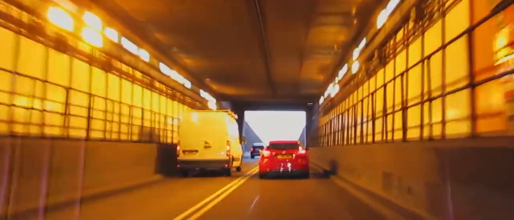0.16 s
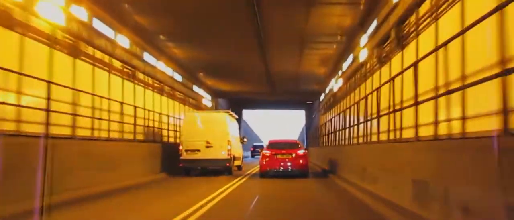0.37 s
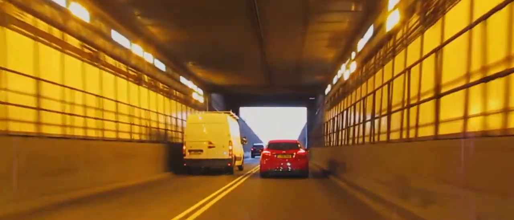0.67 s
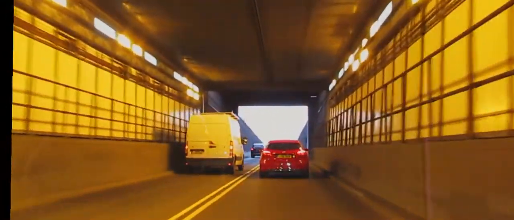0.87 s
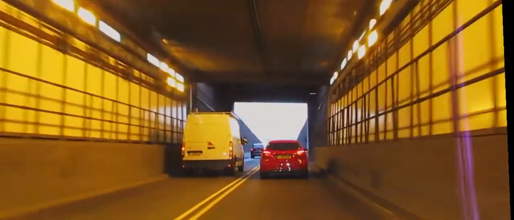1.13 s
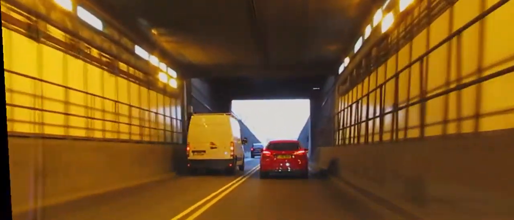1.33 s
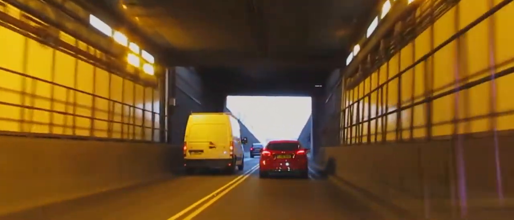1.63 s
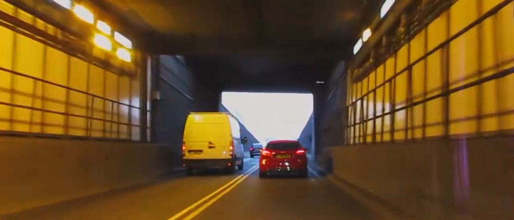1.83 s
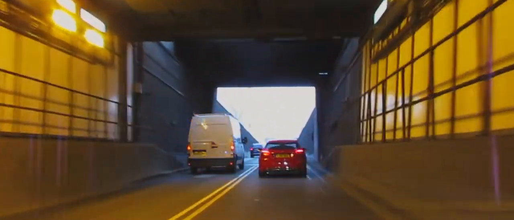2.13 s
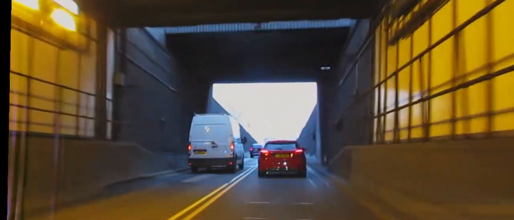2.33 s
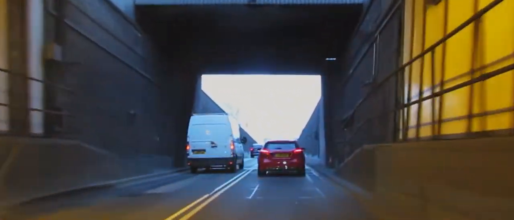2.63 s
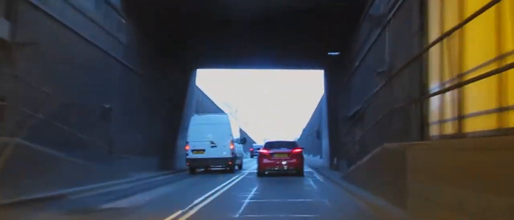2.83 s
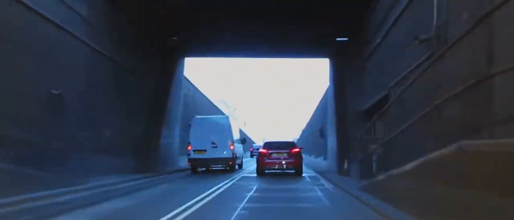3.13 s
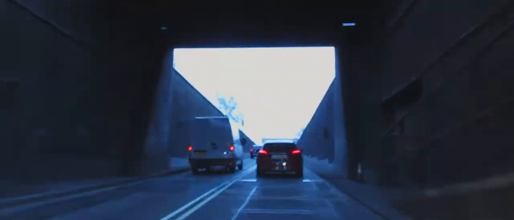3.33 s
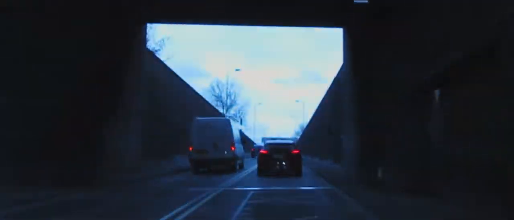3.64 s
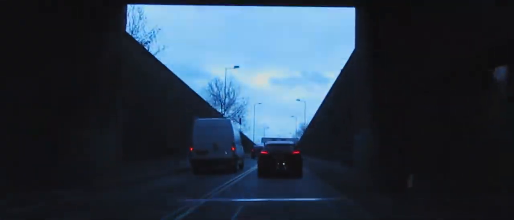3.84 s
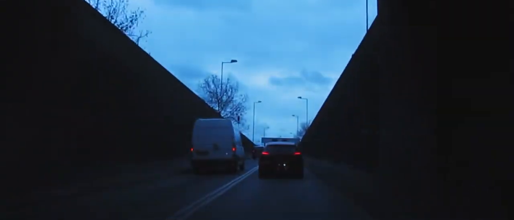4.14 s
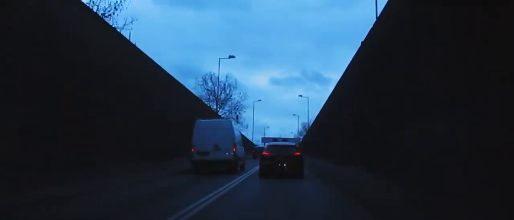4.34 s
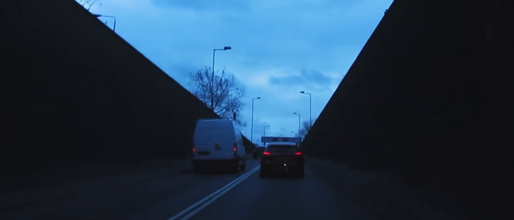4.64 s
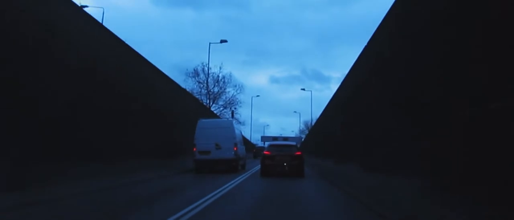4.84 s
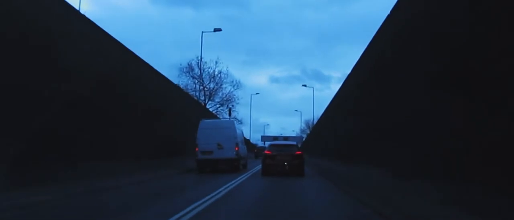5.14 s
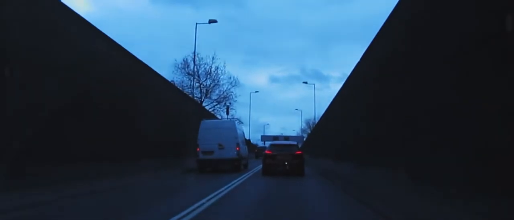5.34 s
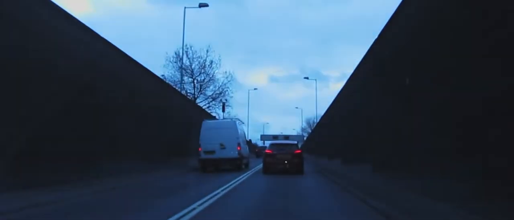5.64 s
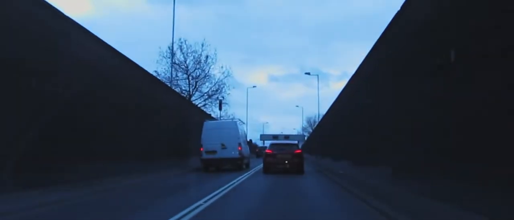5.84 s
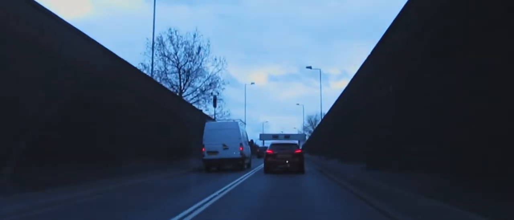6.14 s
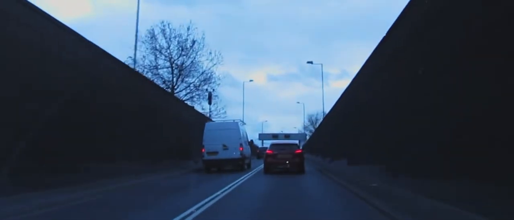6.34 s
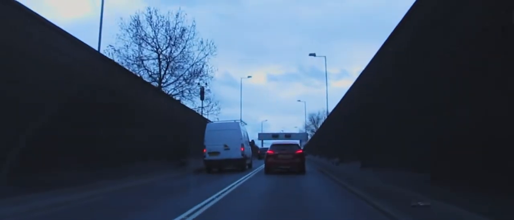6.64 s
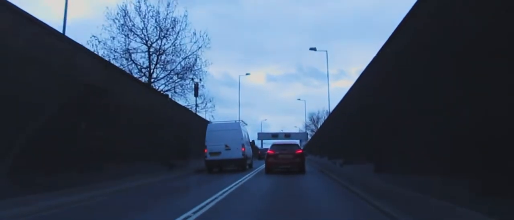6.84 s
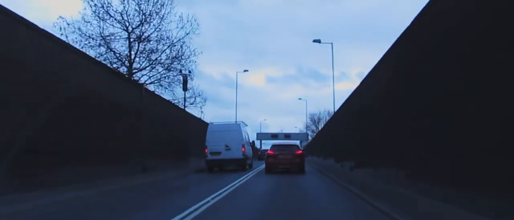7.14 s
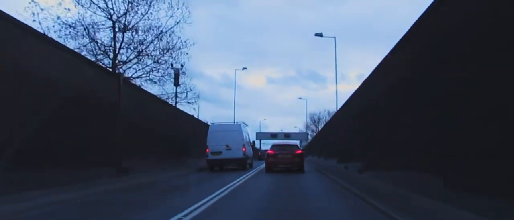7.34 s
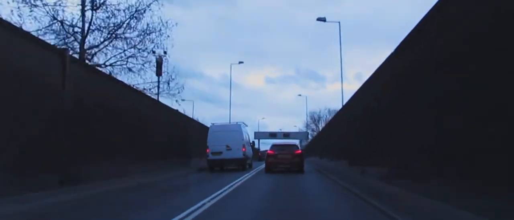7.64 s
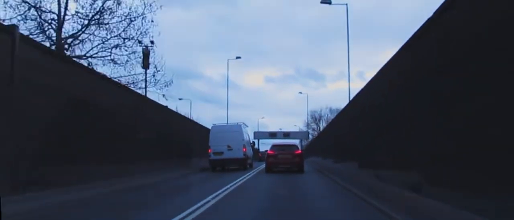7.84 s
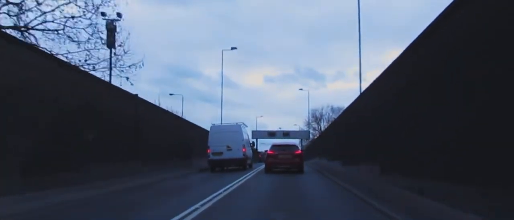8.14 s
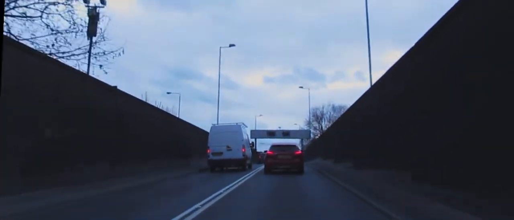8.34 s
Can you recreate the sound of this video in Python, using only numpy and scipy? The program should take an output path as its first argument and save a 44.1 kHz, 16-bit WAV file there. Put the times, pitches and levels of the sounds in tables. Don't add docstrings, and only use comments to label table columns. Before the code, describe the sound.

Car cabin drone and dense tyre roar in a tunnel, easing past the exit with heavy bumps, small trim ticks and a harder engine pull.

```python
import sys
import numpy as np
from scipy import signal
from scipy.fft import rfft, irfft
from scipy.io import wavfile
from scipy.ndimage import uniform_filter1d

SR = 44100
rng = np.random.default_rng(int(sys.argv[2]) if len(sys.argv) > 2 else 0)


def dump_mix(stems):
    frames = np.atleast_2d(stems).T
    limited = np.clip(frames, -1, 1)
    pcm = np.round(limited * 32767).astype(np.int16)
    wavfile.write(sys.argv[1], SR, pcm)


def gain_from_db(level_db):
    decades = np.asarray(level_db, float) / 20
    return 10 ** decades


N = 374406
TIME = np.arange(N) / SR
HZ = np.fft.rfftfreq(N, 1 / SR) + 1e-3
THROTTLE_S, THROTTLE_RISE_S = 5.85, .14


def curve(table):
    return np.interp(TIME, *np.transpose(table))


def ramp(s, rise_s):
    return np.clip((TIME - s) / rise_s, 0, 1)


def hump(s, width_s):
    return np.exp(-((TIME - s) / width_s) ** 2)


def swell(s, hold_s, db, rise_db_per_s, fade_db_per_s):
    rise_db = rise_db_per_s * np.maximum(s - TIME, 0)
    fade_db = fade_db_per_s * np.maximum(TIME - s - hold_s, 0)
    return gain_from_db(db - rise_db - fade_db)


def walk(rate):
    k = int(SR / rate)
    held = np.repeat(rng.standard_normal(N // k + 1), k)
    return 1.253 * uniform_filter1d(uniform_filter1d(held, k), k)[:N]


def shape(points):
    hz, db = np.transpose(points)
    return np.interp(np.log(HZ), np.log(hz + 1), db)


def lifts(modes):
    return sum(db / (1 + (2 * (HZ - hz) / width) ** 2) for hz, width, db in modes)


def noise(db, wide_db=0.):
    # frequency in Hz, side minus mid in dB.
    spread = [(60, -18), (110, -15.5), (200, -25), (380, -13), (700, -10), (1290, -6.5), (2380, -1),
              (4400, -4.5), (8120, 3), (15000, 1)]
    mid, side = rfft(rng.standard_normal((2, N))) * gain_from_db(db)
    share = .35 / (1 + (2400 / HZ) ** 4) / (1 + (HZ / 7000) ** 4)
    side = np.sqrt(1 - share ** 2) * side + 1j * share * mid
    mid = irfft(mid, N)
    side = irfft(side * gain_from_db(shape(spread) + wide_db), N)
    return np.array([mid + side, mid - side]) / np.std(mid)


def add(out, s, sound):
    i = max(int(s * SR), 0)
    out[:, i:i + sound.shape[-1]] += sound[..., :N - i]


def engine():
    # time in seconds, level in dB.
    boom = [(0, -24), (.6, -19), (1.3, -16), (2, -19.5), (2.6, -19), (3.3, -21), (4.9, -25), (5.7, -24.5),
            (7, -20.5), (7.7, -21.5), (8.49, -17.5)]
    # multiple, level in dB against the third.
    overtones = [(2, -5), (3, 0), (4, -6.5), (5, -11)]
    firing_hz, creep_hz_per_s, pull_hz_per_s = 41.67, .68, 1.05
    hz = firing_hz + creep_hz_per_s * TIME + pull_hz_per_s * np.maximum(TIME - THROTTLE_S - .2, 0)
    third_db = -32.5 + 8 * ramp(THROTTLE_S, THROTTLE_RISE_S)
    third_db = third_db + 5 * hump(3.68, 0.4)
    third_db = third_db - 3.5 * hump(8, .25)
    phase = 2 * np.pi * np.cumsum(hz * (1 + 0.00214 * walk(6))) / SR
    out = gain_from_db(curve(boom) + 0.51 * walk(13)) * np.sin(phase)
    for k, db in overtones:
        db = db + 4.9 / (1 + ((k * hz - 205) / 12) ** 2)
        level = gain_from_db(third_db + db + 0.77 * walk(9.8))
        out += level * np.sin(k * phase + rng.uniform(0, 2 * np.pi))
    return np.sqrt(2) * out


def body():
    # frequency in Hz, density in dB per Hz.
    heave_colour = [(12, -24), (20, -1), (26, 0), (34, -4), (45, -6), (56, -10), (75, -24), (150, -70),
                    (400, -140)]
    # frequency in Hz, density in dB per Hz.
    drum_colour = [(32, -9), (55, 0), (68, -6.5), (86, -6), (200, -3.5), (270, -15.5), (330, -13.5),
                   (430, -20), (730, -120)]
    # frequency in Hz, width in Hz, lift in dB.
    panels = [(106, 15, 1.5), (131, 30, 4), (167, 25, 2), (219, 11.3, 10.5), (239.4, 17, 4.5)]
    # time in seconds, heave lift in dB, drumming lift in dB.
    bumps = [(0, 6.5, -2), (.26, 2, -2), (.5, 9, 0.5), (1.37, 5, 1), (2.01, 1, 1.5), (2.29, 3.5, 1),
             (3.03, 6, 2.5), (3.76, 9, 1), (3.45, 2, 3.5), (4.2, 3, 1), (4.58, 6, 5.5), (4.7, 1, 0.5),
             (4.82, 9.5, 3.5), (6.03, -9, 3.5), (6.22, 6, -0.5), (6.68, 1, 3.5), (7.38, -7, 3),
             (7.92, 14, 3), (8.198, 11, 3)]
    bump_width_s = .12
    pull = ramp(THROTTLE_S, THROTTLE_RISE_S)
    heave_db = -26.5 - 4 * pull + sum(db * hump(s, bump_width_s) for s, db, _ in bumps)
    drum_db = -22.5 + 2 * pull + sum(db * hump(s, bump_width_s) for s, _, db in bumps)
    heave = gain_from_db(heave_db) * noise(shape(heave_colour))
    drum = gain_from_db(drum_db + 0.99 * walk(7.6)) * noise(shape(drum_colour) + lifts(panels))
    return heave + drum


def road():
    # time in seconds, enclosure from 0 to about 1.
    enclosure = [(0, 1.1), (.12, 1.28), (.4, 1), (1.6, 0.88), (3.65, .85), (4, 0.36), (4.58, .45),
                 (4.7, 0.24), (5.8, 0.4), (6.5, 0), (8.49, 0.13)]
    # frequency in Hz, width in Hz, lift in dB.
    cabin_modes = [(316, 24, 4), (653, 91, 2.5), (799, 29, -5), (1040, 97, 3.5), (1077, 41, -6.5),
                   (1280, 26, 3), (1564, 340, 3.5), (1820, 170, 0), (2880, 420, 4), (4460, 130, 4.5),
                   (3400, 610, 3)]
    # frequency in Hz, density in dB per Hz.
    roar_colour = [(150, -12), (250, -1), (270, -3), (429, -5.5), (645, -4.5), (809, -7), (997, -5.5),
                   (1110, -9), (1310, -9.5), (2000, -27), (2600, -45), (4400, -120)]
    # frequency in Hz, density in dB per Hz.
    hiss_colour = [(1000, -21.5), (1600, -1.5), (1900, -3.5), (2500, -7.5), (3500, -13.5), (4000, -15.5),
                   (4600, -17.5), (5400, -20.5), (6500, -29), (9000, -100)]
    # frequency in Hz, density in dB per Hz.
    air_colour = [(3000, -60), (4300, -14), (5200, -1), (6300, -1), (7000, -5), (8200, -5), (9000, -7),
                  (11000, -10.5), (11800, -13), (12500, -17.5), (14000, -25), (14700, -31), (15400, -41),
                  (16500, -70)]
    # frequency in Hz, density in dB per Hz.
    spray_colour = [(5000, -50), (8500, -12), (10000, -3), (11000, 0), (11800, -2), (12200, -6),
                    (14000, -7.5), (15400, -9), (16500, -40)]
    walls = curve(enclosure)
    portal = hump(3.75, 1)
    roar_db = -25.5 + 5 * walls
    hiss_db = -38.5 + 6.5 * walls + 1.5 * portal
    air_db = -53 + 5 * walls + 3.5 * portal
    spray_db = -75.5 + 13 * ramp(4.2, 1.4) + 11 * hump(3, .45)
    spray_db = spray_db - 4 * hump(6.55, .4)
    grain, cabin = walk(8), lifts(cabin_modes)
    roar = gain_from_db(roar_db + .3 * walk(9)) * noise(shape(roar_colour) + cabin)
    hiss = gain_from_db(hiss_db + .5 * grain) * noise(shape(hiss_colour) + cabin)
    air = gain_from_db(air_db + 0.44 * grain + .5 * walk(30)) * noise(shape(air_colour))
    spray = gain_from_db(spray_db + .6 * grain + .7 * walk(20)) * noise(shape(spray_colour))
    return roar + hiss + air + spray


def mirror_whistle():
    blow = swell(3.72, .76, -53.7, rise_db_per_s=12, fade_db_per_s=45)
    return blow * noise(-22 * np.log10(1 + ((HZ - 5600) / 150) ** 2))


def thuds():
    # start in seconds, peak in dB, tyre ring in dB against it.
    joints = [
        (3.744, -5.5, -6),
        (4.2, -8, -19),
        (4.347, -7.5, -13),
        (4.554, -14, -14),
        (4.578, -2.5, -14),
        (4.694, -8, -15),
        (4.787, -5, 2.5),
        (4.94, -6, -22),
    ]
    out, t = np.zeros((2, N)), TIME[:SR // 3]
    for s, db, tyre_db in joints:
        boom = -t / 0.014 * np.exp(1 - t / 0.013) * np.sin(2 * np.pi * 40 * t)
        tyre = (t / 0.035) ** 3 * np.exp(3 - 3 * t / 0.025) * np.sin(2 * np.pi * 205 * t)
        add(out, s, gain_from_db(db) * (boom + gain_from_db(tyre_db - 1) * tyre))
    return out


def loose_trim():
    # start in seconds, peak in dB, ring in Hz, t60 in seconds, left minus right in dB.
    ticks = [(4.589, -44, 7000, .07, 1.5), (4.799, -37, 7000, .09, 2), (5.654, -39, 8000, .06, 0),
             (5.674, -39, 10950, .06, -3), (5.699, -41, 7000, .05, 0), (5.769, -42, 6300, .06, 1.5),
             (6.3704, -30, 8800, 0.068, 0), (6.3712, -32, 6000, .05, 0), (6.555, -33, 8950, 0.08, -1),
             (6.5664, -29, 6600, 0.049, 0)]
    # start in seconds, peak in dB, ring in Hz, t60 in seconds, left minus right in dB.
    knocks = [
        (5.943, -26, 2800, 0.12, 3),
        (5.945, -24, 1700, 0.088, 2),
        (6.039, -28, 2600, .06, 2.5),
    ]
    out, t = np.zeros((2, N)), TIME[:SR // 8]
    for s, db, hz, t60, pan_db in list(ticks) + list(knocks):
        decay = np.exp(-np.log(1000) * t / t60)
        burst = rng.standard_normal((2, len(t))) * decay * np.minimum(t / .001, 1)
        band = signal.butter(2, [0.42 * hz, min(1.4 * hz, 15500)], "band", fs=SR)
        broad = signal.lfilter(*band, burst)
        ring = signal.lfilter(*signal.iirpeak(hz, 9., fs=SR), burst)
        sides_db = np.array([[pan_db], [-pan_db]]) / 2
        add(out, s, gain_from_db(db - 3 + sides_db) * (1.45 * broad + 2.9 * ring))
    return out


def cloth_rubs():
    # start in seconds, hold in seconds, level in dB, fade in dB per second.
    rubs = [(5.66, 0.046, -51, 150), (5.75, .05, -56, 30), (6.837, .03, -51, 40), (6.87, 0.16, -48, 45),
            (7.203, 0.034, -57, 62), (7.35, 0.019, -65, 200), (7.488, 0.084, -58, 30), (8.2, .03, -57, 60)]
    # frequency in Hz, density in dB per Hz.
    cloth_colour = [(2500, -30), (4000, -3), (5300, -5), (7000, -2), (8000, -0.5), (9000, -1.5),
                    (11000, 0.5), (11800, 0), (12500, -7), (14000, -7.5), (15400, -13), (16500, -40)]
    rub = sum(swell(s, hold_s, db, 280, fade) for s, hold_s, db, fade in rubs)
    grains = gain_from_db(1.1 * walk(70) + 0.89 * walk(400))
    return rub * grains * noise(shape(cloth_colour), wide_db=-0.5)


def squeak():
    # start frequency in Hz, glide in Hz per second, peak in dB.
    partials = [
        (10250, 70000, -37.5),
        (13650, 5000, -47),
        (15200, 0, -45),
    ]
    out, t = np.zeros((2, N)), TIME[:SR // 16]
    for hz, glide, db in partials:
        jitter = uniform_filter1d(rng.standard_normal(len(t)), size=SR // 300)
        waver = gain_from_db(3.5 * jitter * np.sqrt(SR / 300))
        phase = 2 * np.pi * (hz * t + glide * .03 * (t + .03 * np.exp(-t / .03)))
        fade = np.minimum(t / .002, 1) * np.exp(-np.log(1000) * t / .13)
        add(out, 5.674, gain_from_db(db) * waver * fade * np.sin(phase))
    return out


def scene():
    return engine() + body() + road() + mirror_whistle() + thuds() + loose_trim() + cloth_rubs() + squeak()


def band_limit(x):
    return signal.sosfilt(signal.butter(12, 15670, fs=SR, output="sos"), x)


def record(dry):
    # frequency in Hz, left minus right in dB.
    left_excess = [(60, 1.96), (500, 1.45), (1000, 1.8), (2500, 2.5), (5000, 2.5), (9000, 1), (14000, 2.5)]
    duck_db = sum(-1.5 * ramp(s, 0.022) * np.exp(-np.maximum(TIME - s, 0) / 0.75) for s in (4.6, 4.83))
    sides_db = np.outer([.5, -.5], shape(left_excess))
    hot = irfft(rfft(dry * gain_from_db(duck_db)) * gain_from_db(sides_db), N)
    rounded = np.tanh(0.68 * hot) / 0.72
    top_cut = signal.ellip(8, .2, 70, 15600, fs=SR, output="sos")
    return band_limit(signal.sosfilt(top_cut, rounded))


dry = scene()
out = record(dry)
dump_mix(out)
```